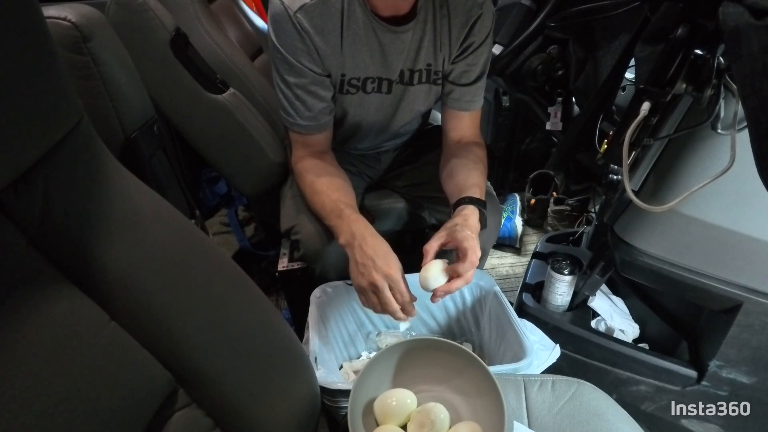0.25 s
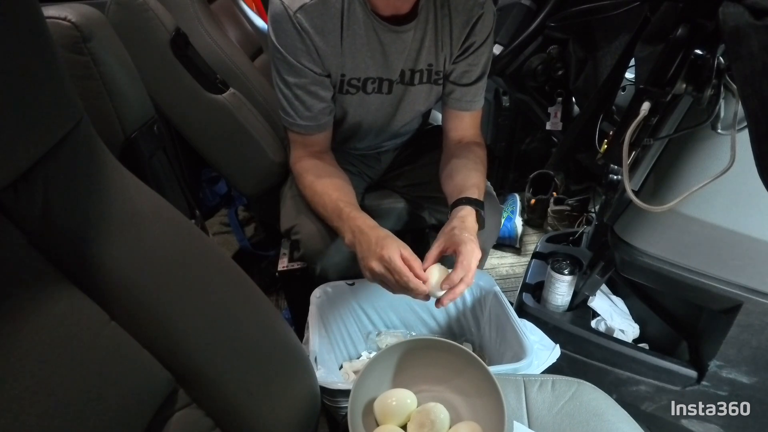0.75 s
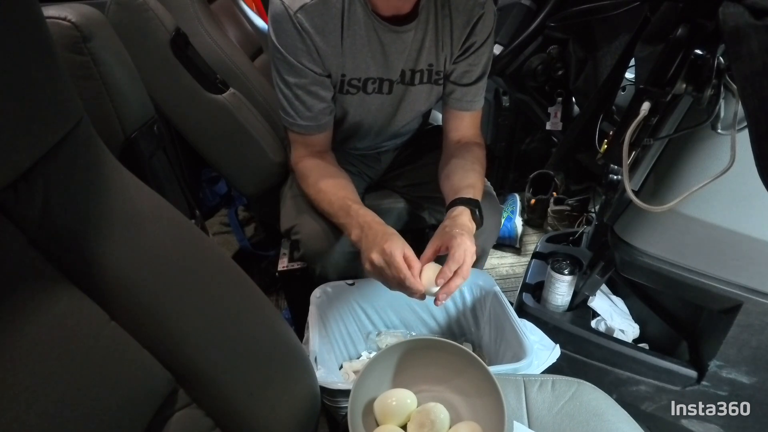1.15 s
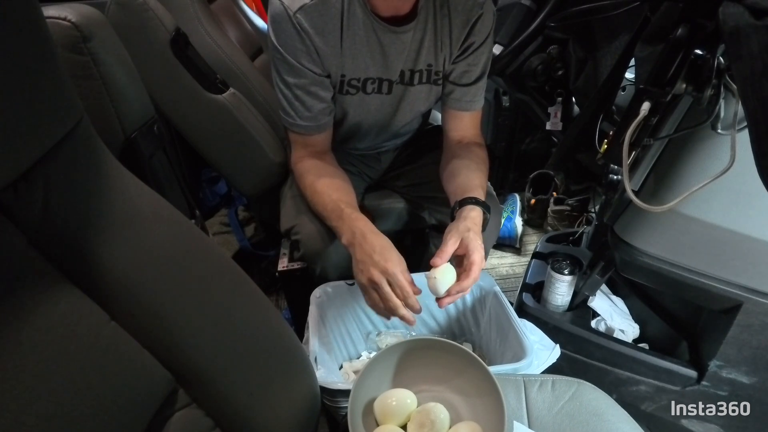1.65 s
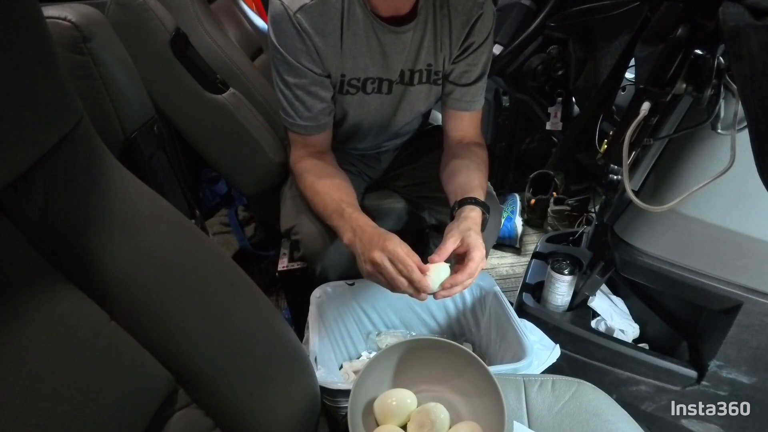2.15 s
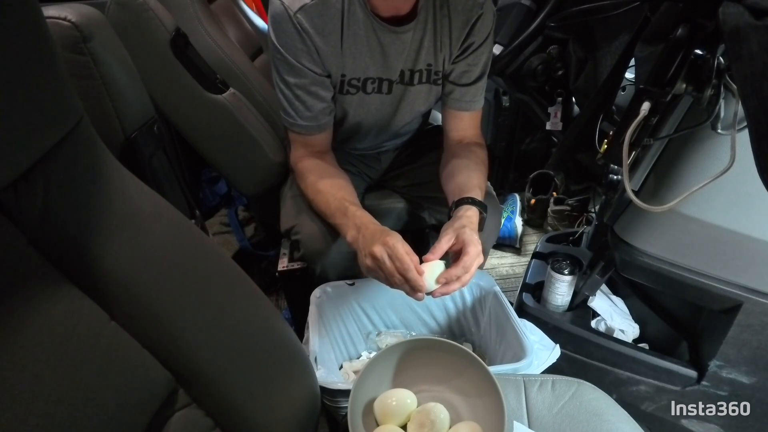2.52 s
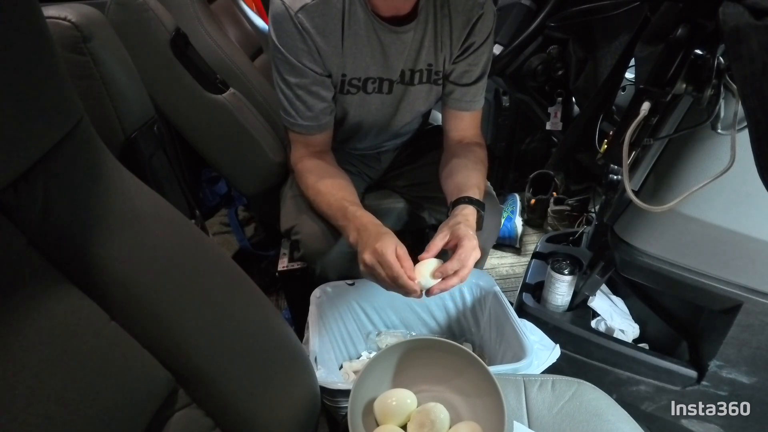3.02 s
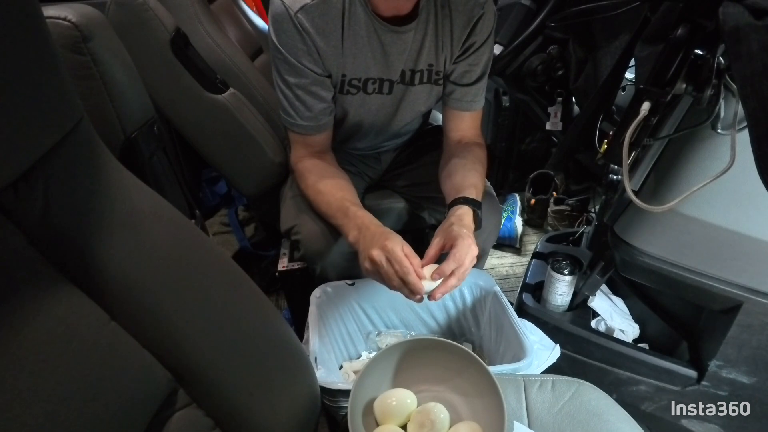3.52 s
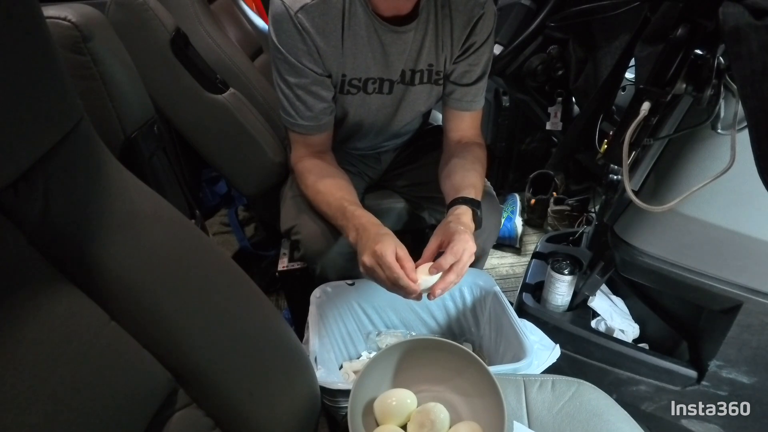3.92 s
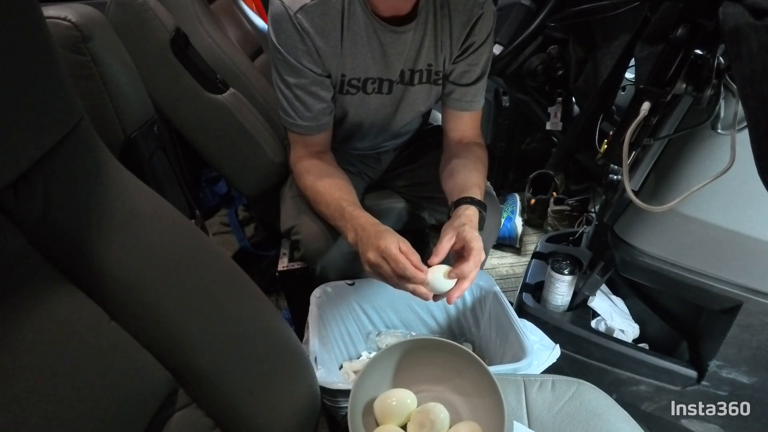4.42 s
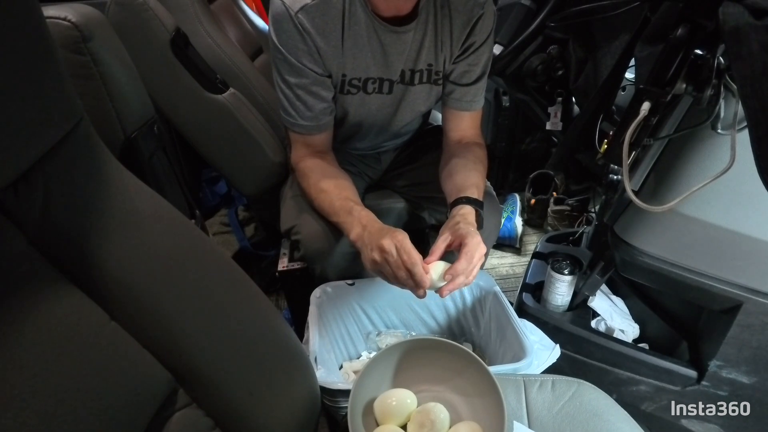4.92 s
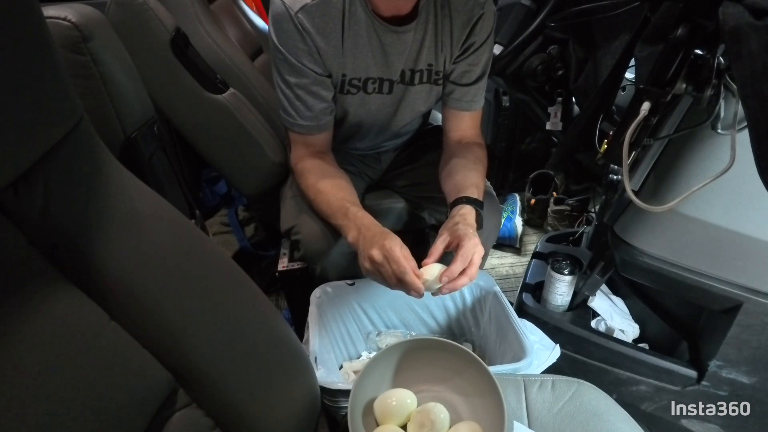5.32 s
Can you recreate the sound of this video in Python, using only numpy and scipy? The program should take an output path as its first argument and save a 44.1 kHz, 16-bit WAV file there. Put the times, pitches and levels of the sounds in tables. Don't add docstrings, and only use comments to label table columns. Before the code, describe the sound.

A boiled egg is peeled close by, shell snapping and crackling, with a double knock on a bowl above a constant deep motor drone.

```python
import sys
import numpy as np
from scipy import signal
from scipy.fft import rfft, irfft, next_fast_len
from scipy.io import wavfile
from scipy.ndimage import uniform_filter1d

SR = 44100
rng = np.random.default_rng(int(sys.argv[2]) if len(sys.argv) > 2 else 0)


def store_wav(level_fs):
    pcm = np.round(np.clip(np.atleast_2d(level_fs), -1, 1) * 32767)
    wavfile.write(sys.argv[1], SR, pcm.T.astype(np.int16))


def invert_db(x):
    u = np.asarray(x, float) / 20
    return 10 ** u


N = 245195

# (multiple of turn rate, level [dB])
MOTOR_ORDERS = [(1, -38), (2, -47), (3, -35), (4, -38), (5, -43), (6, -46), (7, -31), (8, -36), (9, -45),
                (10, -52), (11, -53), (12, -47), (13, -53), (14, -61), (15, -59), (16, -55), (17, -66),
                (18, -70), (19, -61), (20, -66), (21, -64), (22, -73), (23, -69), (24, -71), (25, -74),
                (26, -78), (27, -74), (28, -88), (29, -83), (30, -77)]
MOTOR_PATHS = [(1, .09), (4, -.01), (6, .095), (9, .3225), (13, -.13), (21, -.1425)]
# (pitch [Hz], level [dB], wander [Hz])
FAN_TONES = [(40.66, -45.5, 0.15), (119.3, -48, .3), (158.5, -54, 0.56), (200.7, -48.5, .3),
             (213.4, -64.5, 0.27), (246, -71, 0.75), (316, -61, 1.3), (484.7, -66.5, .6), (575, -64, .3),
             (1966, -89.5, 2.1)]
# (frequency [Hz], density [dB per Hz])
AIR_SPECTRUM = [(8, -56.5), (18, -67.5), (34, -66.5), (64, -65.5), (185, -67), (240, -71.5), (540, -87.5),
                (900, -90.5), (1080, -106), (1950, -111), (2300, -119), (3500, -124), (5000, -131),
                (16000, -140)]
# (time [s], peak [dB], piece size [mm], thud into the egg re peak [dB],
# fall above the pitch [dB per octave])
CRACKS = [(.162, -42, 10.4, 11.5, 6), (0.4082, -49, 5.4, 5, 5), (0.414, -32.5, 7, -14, 4.5),
          (0.4577, -34, 7.7, -3.5, 8), (1.0497, -36, 3.5, -3, 15), (1.1962, -40.5, 5.9, -28, 32),
          (1.2276, -35, 5.04, -27, 29), (1.315, -50.5, 4.2, 15.5, 25), (1.373, -48, 3.3, 6, 11),
          (1.4401, -38.5, 9.4, 2, 6.5), (1.4504, -36.5, 3.5, -0.5, 27), (1.809, -18, 5, -1.5, 27.5),
          (1.8353, -28.5, 5.9, 16.5, 15), (1.8994, -42, 7.8, 6, 10.5), (1.9097, -33, 7.6, 2.3, 8),
          (1.956, -52, 2.8, 8, 4.5), (2.8436, -33, 4.2, -23, 10.5), (2.8529, -32.5, 4.2, -21, 13),
          (2.9687, -30, 5.6, 2.5, 11), (2.979, -33.5, 3.6, 7, 9), (3.7674, -42.5, 2.2, -8, 15),
          (3.775, -38, 5.2, -3.5, 6), (5.1684, -37, 3.3, -20, 9), (5.192, -31.5, 2.9, -26, 15)]
# (time [s], peak [dB])
FLAKES = [(0.0716, -40), (1.0248, -39), (1.0954, -46), (1.1234, -61), (1.1753, -54), (2.6312, -44.5),
          (2.7268, -62), (2.7746, -60), (2.8173, -49.5), (2.8893, -44.5), (2.909, -40), (2.9285, -49),
          (2.9497, -45), (5.3426, -45), (5.3504, -43), (5.3713, -46), (5.3845, -45.5)]
# (time [s], peak [dB])
SLIVERS = [
    (4.648, -59.5),
    (4.666, -46.5),
    (5.279, -49),
    (5.425, -46),
    (5.439, -47),
    (5.456, -42),
    (5.5398, -50),
]
# (time [s], peak [dB], size [mm])
CRUMBS = [(2.03, -70.5, 2.8), (2.6723, -52, 2.6), (2.6816, -50, 2.9), (3.3967, -69.5, 2.2),
          (3.6005, -66.5, 2.8), (3.7285, -59.5, 2.6), (3.757, -50.5, 2.8), (3.7997, -59, 2.3),
          (3.8332, -61.5, 3.1), (4.3534, -70, 4.3), (4.7835, -71, 4), (4.96, -71, 2.6),
          (5.0759, -62.5, 3.6), (5.0968, -63, 2.7), (5.128, -54, 2.1), (5.1436, -45.5, 3.6),
          (5.3094, -45.5, 3.16)]
# (frequency [Hz], level [dB])
THUD_SPECTRUM = [(420, -40.5), (650, -14.5), (1600, -1), (3600, -20)]
# (centre [Hz], width [Hz], lift [dB])
HAND_MODES = [(3140, 630, 6), (4740, 300, 0.5), (6140, 1400, 1), (8484, 310, 6), (11200, 460, 6),
              (13000, 500, 4.5)]
# (time at full level [s], hold [s], level [dB], size of loose bits [mm])
RUBS = [(0.077, 0.0051, -60.5, 4.6), (.485, 0.047, -76.5, 8.1), (1.041, 0.1, -60.5, 4.6),
        (1.201, 0.033, -58, 6), (1.251, .1, -54.5, 5.35), (1.399, .06, -64.5, 4.9),
        (1.916, 0.064, -63.5, 8.5), (2.077, 0.019, -81, 9.5), (2.901, 0.024, -56, 5.3),
        (2.967, 0.034, -60.5, 3.6), (3.771, .003, -63, 7.4), (5.094, 0.06, -70.5, 2.5),
        (5.2, 0.0053, -50.5, 4.9), (5.258, 0.031, -70, 3), (5.327, 0.042, -58.5, 3.3),
        (5.458, 0.034, -69, 4.9), (5.55, .005, -82, 3.5)]
# (time [s], pitch [Hz], level [dB], t60 [s])
PINGS = [(.162, 1470, -48.5, 0.05), (.17, 642, -50, 0.042), (.4125, 1726, -47, 0.066),
         (.46, 920, -49.5, .06), (1.05, 1570, -55, .05), (1.255, 2400, -60, 0.24),
         (1.314, 1495, -58, 0.076), (1.322, 1780, -56, 0.086), (1.345, 1590, -59, .08),
         (1.451, 1150, -52, .04), (1.8, 334, -48, 0.058), (1.9095, 3300, -32.5, 0.021),
         (1.94, 3050, -62.5, .15), (.528, 3150, -70.5, .12), (2.8525, 5600, -38, .022),
         (2.979, 2320, -46.5, 0.051), (4.648, 8050, -72, 0.056), (5.335, 2850, -68.5, 0.098),
         (5.4262, 8360, -62, .04), (5.4562, 8330, -56, 0.037)]
# (time [s], strength [dB])
KNOCKS = [
    (1.8082, -26),
    (1.8358, -28),
]
# (pitch [Hz], level on first knock [dB], level on second [dB], t60 [s])
BOWL_MODES = [(555.5, -6, -10, .05), (642.5, 1, 3, .06), (704, -7, -7, .04), (766, -4, -9, 0.0531),
              (860.4, -6, -5, 0.036), (963, -3.5, -9.5, 0.038), (1220, -20, -11, 0.019),
              (1583, -12, -8.5, .08), (2010, 2.5, -16, 0.022), (2355, -5.5, -12.5, 0.049),
              (2850, -3, -14, .035), (3390, -12, -19.5, .03), (4454, -12, -17, 0.03)]

MOTOR_HZ, MOTOR_DB = 19.192, 0.59
MOTOR_DRIFT_TURNS, MOTOR_WOBBLE_DB = 0.008, 0.79
PIECE_HZ_MM = 28000
EDGE_HZ, EDGE_DB = 14500, -7
FLAKE_MM, SLIVER_MM = 3.87, 3.3
# (rise below the pitch [dB per octave], ring t60 [s])
CRACK_KIND = (10, 0.075)
# (thud re peak [dB], fall above the pitch [dB per octave], rise below it [dB per octave], ring t60 [s])
FLAKE_KIND = (-12.5, 14, 25, 0.1)
SLIVER_KIND = (-23, 30, 30, 0.08)
CRUMB_KIND = (-13, 11.5, 18.5, 0.01)
RUB_BELOW_DB_OCT, RUB_ABOVE_DB_OCT = 15.5, 9
RUB_RISE_DB_S, RUB_FALL_DB_S, RUB_SPAN_DB = 1100.5, 521.5, 29
GATE_DB, GATE_DEPTH_DB, GATE_FROM_HZ = -121, -10, 2150
HISS_DB, TICK_DB, TOP_HZ = -102, -63.5, 16100


def unit(x):
    return x / np.sqrt(np.mean(x ** 2) + 1e-30)


def walk(rate_hz):
    hold = int(SR / rate_hz)
    steps = np.repeat(rng.standard_normal(N // hold + 1), hold)
    return 1.3 * uniform_filter1d(uniform_filter1d(steps, hold), hold)[:N]


def shape(x, gain):
    size = next_fast_len(len(x))
    f = np.arange(size // 2 + 1) * SR / size + 1
    return irfft(rfft(x, size) * gain(f), size)[:len(x)]


def band(x, hz, octaves):
    return shape(x, lambda f: np.exp(-(np.log2(f / hz) / octaves) ** 4))


def add(out, x, s):
    i = int(s * SR)
    out[i:i + len(x)] += x[:N - i]


def motor(size=4096):
    order, db = np.transpose(MOTOR_ORDERS)
    envelope_db = np.interp(np.arange(65), np.r_[0, order, 64], np.r_[-60, db, -110])
    cepstrum = irfft(np.log(invert_db(envelope_db)))
    phase = rfft(cepstrum * np.r_[1, np.full(63, 2), 1, np.zeros(63)]).imag
    angle, pulse = np.arange(size) / size, 0
    for k, level_db in zip(order, db):
        lag_turns = [lag for first, lag in MOTOR_PATHS if first <= k][-1]
        pulse = pulse + invert_db(level_db) * np.cos(2 * np.pi * k * (angle - lag_turns) + phase[int(k)])
    turns = MOTOR_HZ * np.arange(N) / SR + MOTOR_DRIFT_TURNS * walk(0.94)
    level = np.sqrt(2) * invert_db(MOTOR_DB + MOTOR_WOBBLE_DB * walk(2.4))
    return level * np.interp(turns, angle, pulse, period=1)


def fan():
    out = np.zeros(N)
    for hz, db, wander_hz in FAN_TONES:
        swell_db, swell_hz = (5.85, 14.2) if hz > 1500 else (1.25, 2.2)
        level = np.sqrt(2) * invert_db(db + swell_db * walk(swell_hz))
        out += level * np.sin(2 * np.pi * np.cumsum(hz + wander_hz * walk(1.8)) / SR)
    return out


def air():
    hz, db = np.transpose(AIR_SPECTRUM)
    noise = shape(rng.standard_normal(N),
                  lambda f: invert_db(np.interp(np.log(f), np.log(hz), db)) * np.sqrt(SR / 2))
    out = noise.copy()
    for centre_hz in 800 * 2 ** np.arange(0, 2.6, 0.25):
        flicker_db = min(centre_hz / 800, 2.2)
        out += band(noise, centre_hz, 0.125) * (invert_db(flicker_db * walk(25)) - 1)
    return out


def hands_db(f):
    return sum(db / (1 + ((f - hz) / (width / 2)) ** 2) for hz, width, db in HAND_MODES)


def piece_db(f, mm, below_db_oct, above_db_oct):
    octaves = np.log2(f * mm / PIECE_HZ_MM)
    return np.where(octaves < 0, below_db_oct * octaves, -above_db_oct * octaves)


def breaks():
    cracks = [tuple(row) + CRACK_KIND for row in CRACKS]
    flakes = [tuple(row) + (FLAKE_MM,) + FLAKE_KIND for row in FLAKES]
    slivers = [tuple(row) + (SLIVER_MM,) + SLIVER_KIND for row in SLIVERS]
    crumbs = [tuple(row) + CRUMB_KIND for row in CRUMBS]
    return cracks + flakes + slivers + crumbs


def snaps(size=8192):
    out, t = np.zeros(N), np.arange(size) / SR
    f = np.arange(size // 2 + 1) * SR / size + 1
    thud_hz, thud_spectrum_db = np.transpose(THUD_SPECTRUM)
    for s, db, mm, thud_db, above, below, t60 in breaks():
        clumps = uniform_filter1d(rng.standard_normal(size), 30) * np.sqrt(30)
        shower = rng.standard_normal(size) * invert_db(2.7 * clumps)
        fade = np.exp(-t / 0.0015) + 0.56 * invert_db(-60 * t / t60)
        burst = shower * fade * np.minimum(t / 0.0013, 1)
        egg = invert_db(thud_db + np.interp(np.log(f), np.log(thud_hz), thud_spectrum_db))
        egg = egg / (1 + (f / thud_hz[-1]) ** 2)
        tilt_db = 20 * np.log10(invert_db(piece_db(f, mm, below, above)) + egg)
        tilt_db = tilt_db + EDGE_DB / (1 + (EDGE_HZ / f) ** 12)
        flake_db = 4.0 * np.interp(f, np.linspace(0, SR / 2, 128), rng.standard_normal(128))
        colour = irfft(np.log(invert_db(tilt_db + flake_db + hands_db(f))))
        colour[1:size // 2] *= 2
        colour[size // 2 + 1:] = 0
        snap = irfft(rfft(burst) * np.exp(rfft(colour)), size)
        add(out, snap * invert_db(db - 3.5), s - 0.0005)
    return out


def patchy(x, depth_db, size=512):
    z = signal.stft(x, nperseg=size)[2]
    field = uniform_filter1d(uniform_filter1d(rng.standard_normal(z.shape), 6, axis=0), 7, axis=1)
    return signal.istft(z * invert_db(depth_db * unit(field)), nperseg=size)[1][:N]


def rubs():
    t = np.arange(N) / SR
    click_db = 2.5 * np.minimum(rng.exponential(size=N), 3)
    clicks = (rng.random(N) < 900 / SR) * rng.standard_normal(N) * invert_db(click_db)
    tail = rng.standard_normal(600) * np.exp(-np.arange(600) / SR / 0.002)
    grit = unit(signal.fftconvolve(clicks, tail)[:N]) + 0.62 * rng.standard_normal(N)
    grit = patchy(shape(grit, lambda f: invert_db(0.62 * hands_db(f))), depth_db=3.0)
    bands = [(2900, 0.63), (7200, 0.55), (13200, 0.49)]  # (Hz, octaves)
    layers = [(hz, unit(band(grit, hz, octaves))) for hz, octaves in bands]
    out = np.zeros(N)
    for s, hold_s, db, mm in RUBS:
        down_db = RUB_RISE_DB_S * np.maximum(s - t, 0) + RUB_FALL_DB_S * np.maximum(t - s - hold_s, 0)
        stroke = invert_db(db - 1.0) * np.maximum(invert_db(-down_db) - invert_db(-RUB_SPAN_DB), 0)
        for hz, layer in layers:
            out += stroke * invert_db(piece_db(hz, mm, RUB_BELOW_DB_OCT, RUB_ABOVE_DB_OCT)) * layer
    return out


def pings(size=4096):
    out, t = np.zeros(N), np.arange(size) / SR
    for s, hz, db, t60 in PINGS:
        ring = invert_db(db - 60 * t / t60) * np.sin(2 * np.pi * hz * t)
        add(out, ring * np.minimum(t / 0.0019, 1), s)
    return out


def knocks(size=8192):
    out, t = np.zeros(N), np.arange(size) / SR
    for k, (s, db) in enumerate(KNOCKS):
        ring = np.zeros(size)
        for m, mode in enumerate(BOWL_MODES):
            hz, mode_db, t60 = mode[0], mode[1 + k], mode[-1]
            ring += (-1) ** m * invert_db(mode_db - 60 * t / t60) * np.sin(2 * np.pi * hz * t)
        add(out, invert_db(db) * ring * np.minimum(t / 0.0008, 1), s)
        add(out, invert_db(db - 13.5) * ring * np.minimum(t / 0.000764, 1), s + 0.0031)
        rattle = band(rng.standard_normal(size), 880, 0.99) * invert_db(-60 * t / 0.042)
        add(out, invert_db(db) * rattle, s)
    return signal.sosfilt(signal.butter(4, 480, "high", fs=SR, output="sos"), out)


def cab(x, t60=0.11, wet_db=-14):
    t = np.arange(SR // 4) / SR
    tail = band(rng.standard_normal(len(t)), 2500, 1.5) * invert_db(-60 * t / t60) * (t > 0.003)
    tail = tail / np.sqrt(np.sum(tail ** 2))
    return x + invert_db(wet_db) * signal.fftconvolve(x, tail)[:N]


def scene():
    peeling = snaps() + rubs() + pings() + knocks()
    return (motor() + fan() + air() + cab(peeling))[None]


def gate(x, size=512):
    settings = dict(nperseg=size, noverlap=size * 3 // 4, scaling="psd")
    f, _, z = signal.stft(x, SR, **settings)
    power = uniform_filter1d(uniform_filter1d(2 * np.abs(z) ** 2, 3, axis=0), 6, axis=1)
    over = (np.maximum(power, 0) / invert_db(2 * GATE_DB)) ** 2
    gain = np.maximum(over / (1 + over), invert_db(GATE_DEPTH_DB))
    gain[f < GATE_FROM_HZ] = 1
    return signal.istft(z * gain, SR, **settings)[1][:N]


def hiss_and_ticks():
    ticks = (rng.random(N) < 300 / SR) * (walk(13) > 0.1) * rng.uniform(-1, 1, N)
    return invert_db(HISS_DB) * rng.standard_normal(N) + invert_db(TICK_DB) * band(ticks, 9500, 0.96)


def top_cut(x):
    return signal.sosfilt(signal.butter(12, 16480, fs=SR, output="sos"), x)


def record(dry):
    cut = signal.ellip(10, 0.2, 60, TOP_HZ, fs=SR, output="sos")
    mix = signal.sosfilt(cut, gate(dry[0]) + hiss_and_ticks())[None]
    return top_cut(mix)


dry = scene()
out = record(dry)
store_wav(out)
```